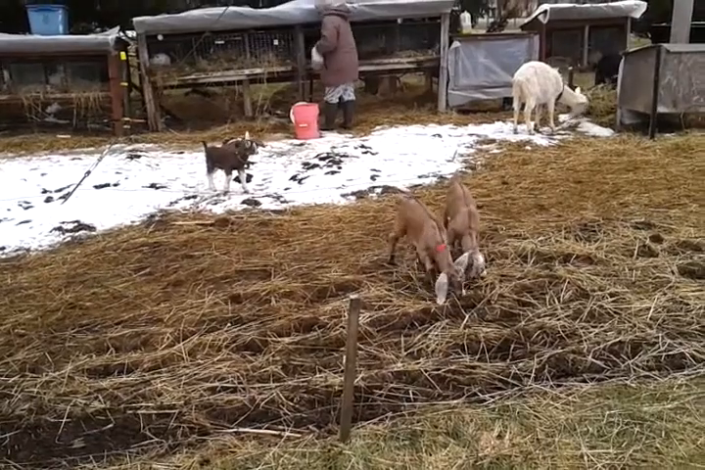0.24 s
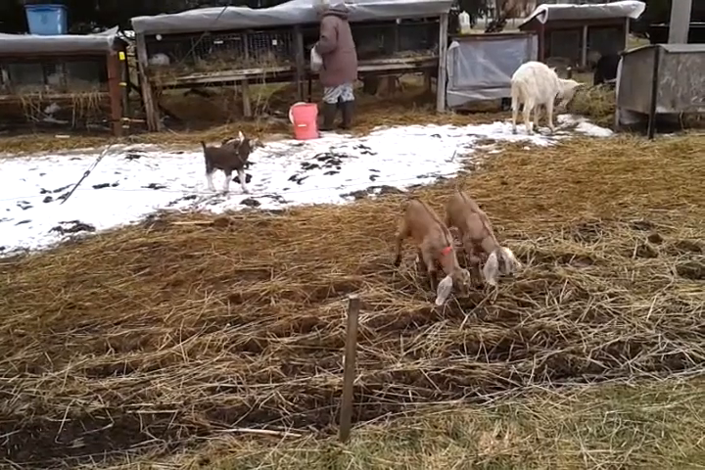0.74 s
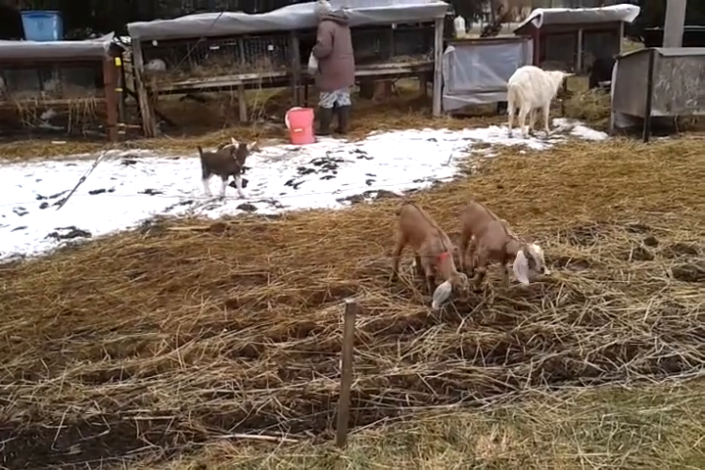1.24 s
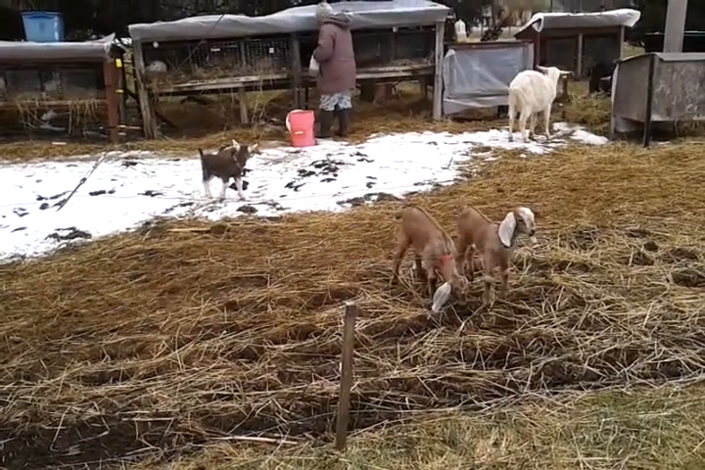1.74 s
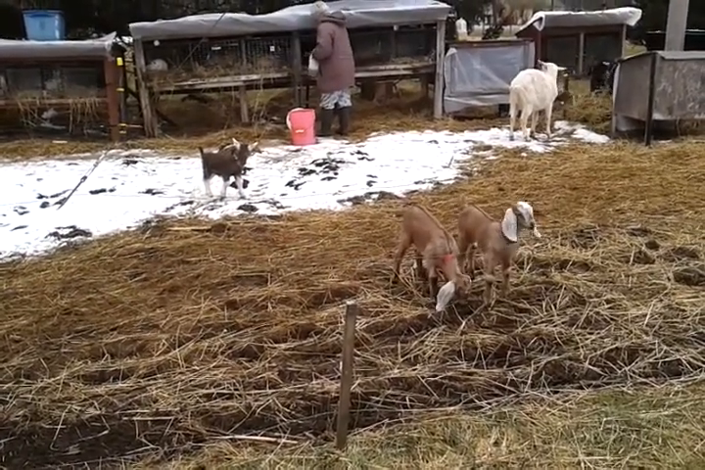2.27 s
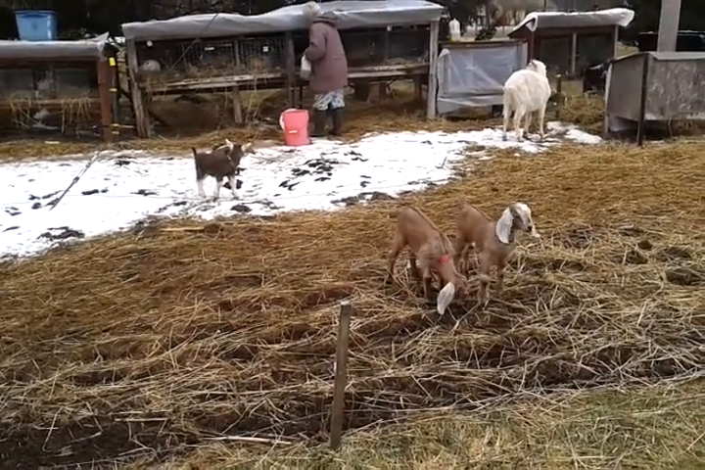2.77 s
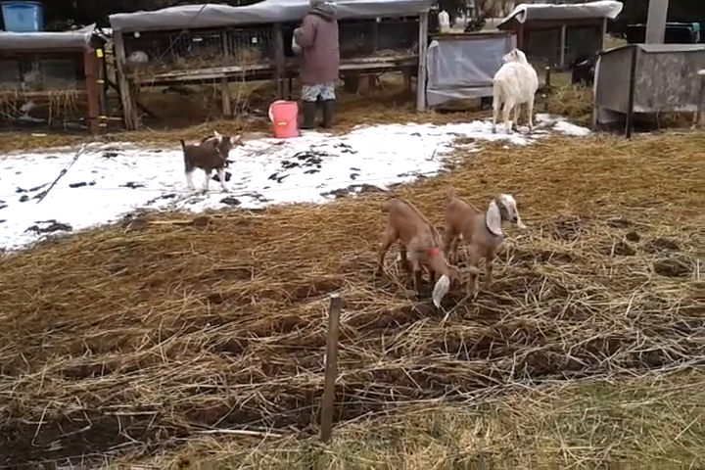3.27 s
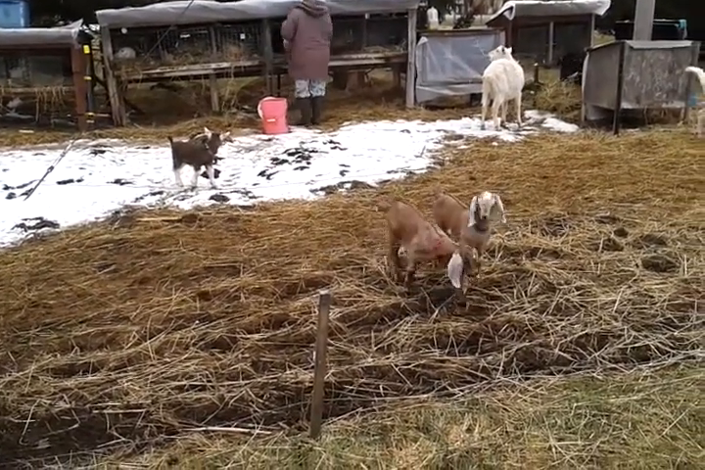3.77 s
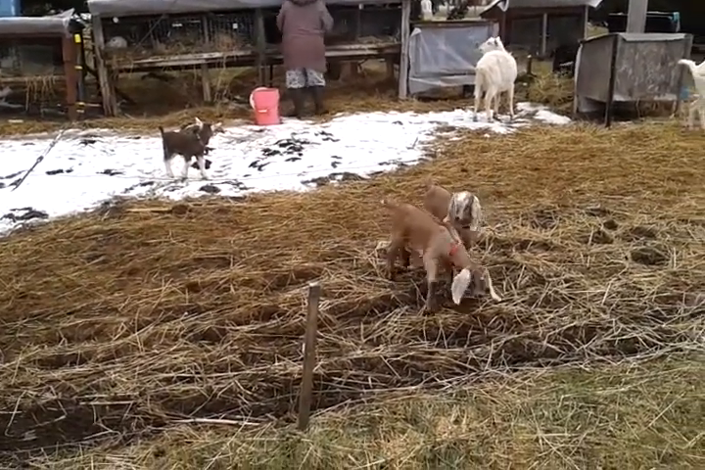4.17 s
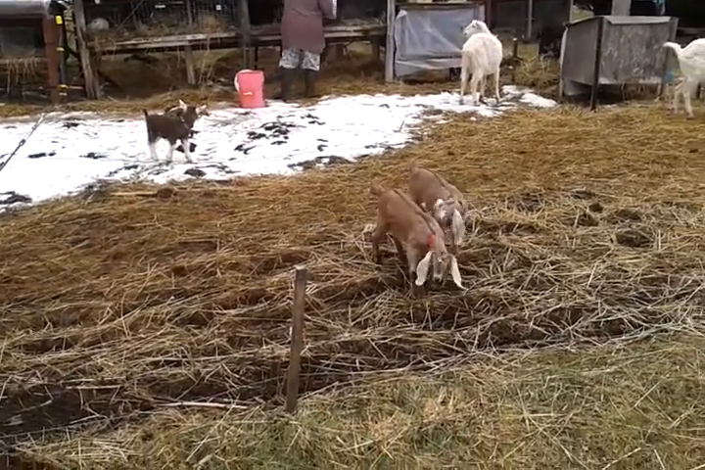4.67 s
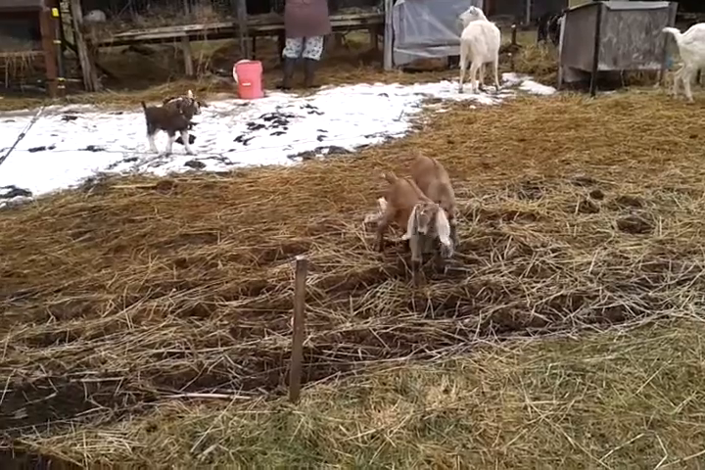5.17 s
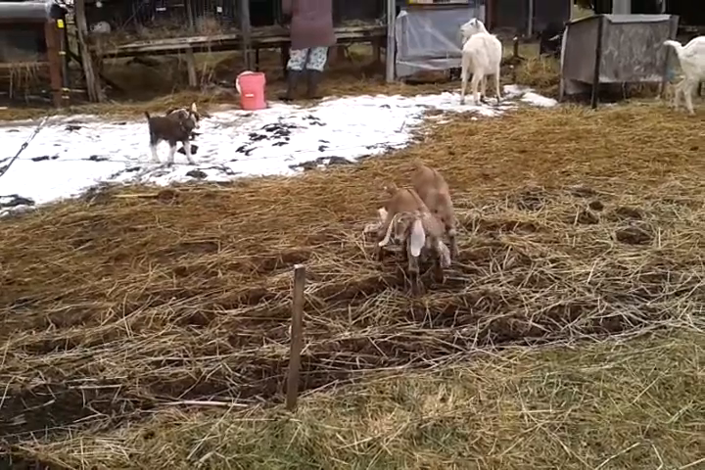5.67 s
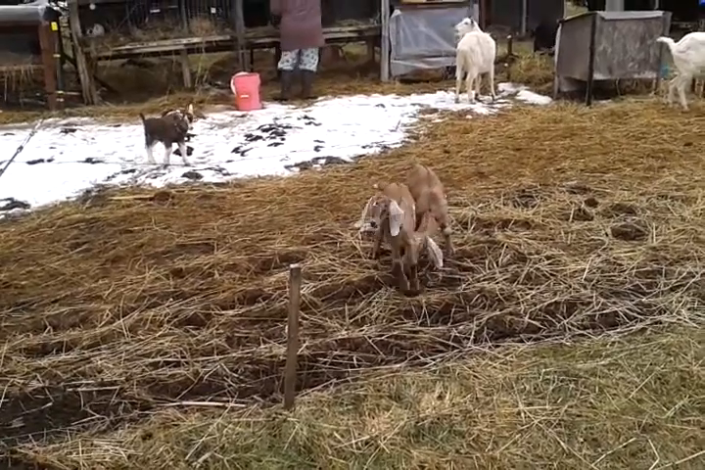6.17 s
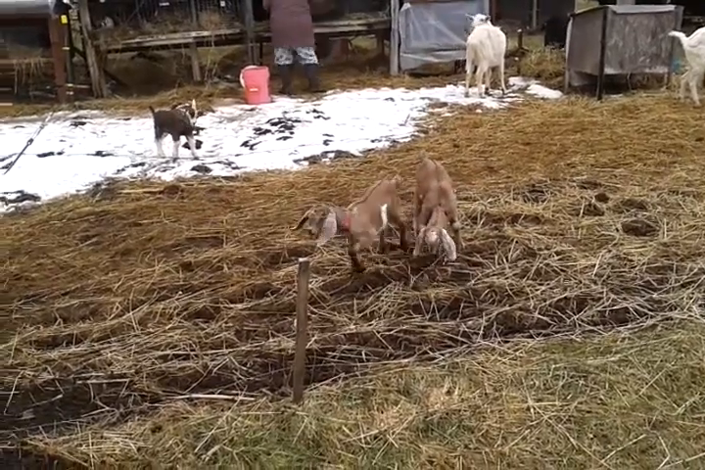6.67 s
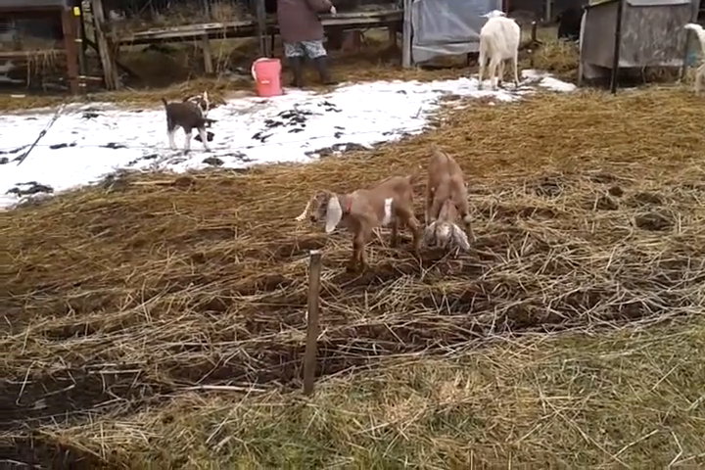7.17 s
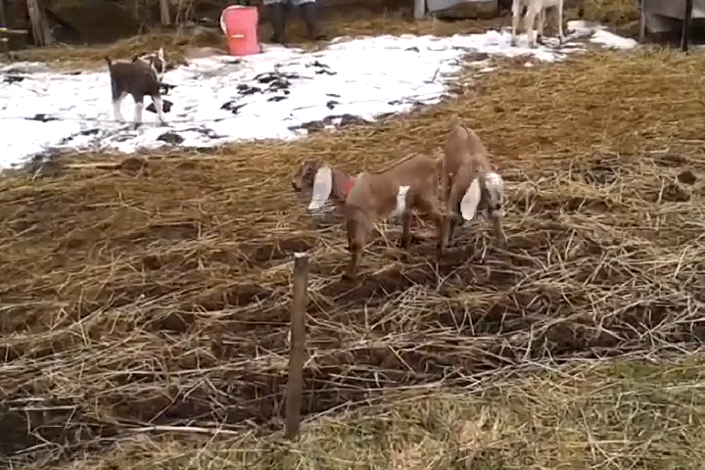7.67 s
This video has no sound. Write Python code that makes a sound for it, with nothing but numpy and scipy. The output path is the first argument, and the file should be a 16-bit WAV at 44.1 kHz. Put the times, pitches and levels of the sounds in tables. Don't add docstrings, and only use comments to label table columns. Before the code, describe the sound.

Goats bleat and grunt over rustling straw and clucking hens, a rooster crows hoarsely, and sharp handling knocks punctuate the quiet farmyard.

```python
import sys
import numpy as np
from scipy import signal
from scipy.fft import rfft, irfft, next_fast_len
from scipy.io import wavfile
from scipy.ndimage import uniform_filter1d, map_coordinates

SR = 44100
rng = np.random.default_rng(int(sys.argv[2]) if len(sys.argv) > 2 else 0)


def boost(x):
    u = np.asarray(x, float) / 20
    return 10 ** u


def dump_mix(stems):
    frames = np.atleast_2d(stems).T
    limited = np.clip(frames, -1, 1)
    pcm = np.round(limited * 32767).astype(np.int16)
    wavfile.write(sys.argv[1], SR, pcm)


N = 349698
T = np.arange(N) / SR


def unit(x):
    return x / np.sqrt(np.mean(x ** 2) + 1e-20)


def along(points, hz):
    f, v = np.transpose(points)
    return np.interp(np.log(hz + 1), np.log(f + 1), v)


def wobble(rate, size=N):
    knots = rng.standard_normal(int(size * rate / SR) + 4)
    return map_coordinates(knots, [np.arange(size) * rate / SR])


def filtered(x, response):
    m = next_fast_len(len(x) + 8192)
    return irfft(rfft(x, m) * response(np.fft.rfftfreq(m, 1 / SR)), m)[:len(x)]


def ring(out_hz, t60, t):
    return np.sin(2 * np.pi * out_hz * t) * boost(-60 * t / t60)


def rush(spectrum, patchy_db, spiky_db):
    z = signal.stft(rng.standard_normal(N) * boost(spiky_db * wobble(400)), nperseg=512)[2]
    field = uniform_filter1d(uniform_filter1d(rng.standard_normal(z.shape), 6, 0), 8, 1)
    x = signal.istft(z * boost(patchy_db * unit(field)), nperseg=512)[1][:N]
    return unit(filtered(x, lambda hz: boost(along(spectrum, hz))))


def swells(rows):
    return sum(boost(db) * np.exp(-((T - s) / half) ** 2) for s, half, db in rows)


def resonances(throat, f):
    total = 0
    for k, (centre, width, db) in enumerate(throat):
        damping = 1j * f * width
        total = total + (-1) ** k * boost(db / 2) * damping / (centre * centre - f * f + damping)
    return total ** 2


def voice(calls, throat, gain_db, rough, jitter, quaver_hz=15, quaver_db=0, beat_hz=300, beat=0.87,
          split=0, split_hz=78, top_hz=8000):
    out = np.zeros(N)
    third_db = -10
    for rows in calls:
        s, pitch, loud, *first = np.transpose(rows)
        a, b = int(s[0] * SR), int(s[-1] * SR)
        t, size = T[a:b], b - a
        share = np.clip(np.interp(t, *np.transpose(rough)) if np.ndim(rough) else rough, 0, 1)
        quaver = np.sin(2 * np.pi * quaver_hz * (t - s[0]) + .5 * wobble(13.0, size))

        unsteady = jitter * wobble(60, size) + .013 * share * wobble(beat_hz, size)
        turn = 2 * np.pi * np.cumsum(np.interp(t, s, pitch) * (1 + unsteady)) / SR
        k = np.arange(1, int(top_hz / pitch.max()) + 1)[:, None]
        weight = boost((k == 1) * np.interp(t, s, first[0]) + (k == 3) * third_db) if first else 1
        pulses = unit(np.sum(weight * np.cos(k * turn), axis=0))
        pulses = pulses * (1 + beat * share * wobble(beat_hz, size))
        second = np.cos(2 * np.pi * np.cumsum(split_hz * (1 + .35 * wobble(40, size))) / SR)
        pulses = pulses * (1 + split * share * (2 * second - 1))

        breath = unit(rng.standard_normal(size) * (1 + np.cos(turn)))
        source = np.sqrt(1 - share ** 2) * pulses + share * breath
        sound = unit(filtered(source, lambda f: resonances(throat, f)))
        fade = np.clip(np.minimum(t - s[0], s[-1] - t) / 0.007, 0, 1)
        out[a:b] += sound * fade * boost(np.interp(t, s, loud) + gain_db + quaver_db * quaver)
    return out


def shaped(calls, shape):
    attack, release, edge_db, sag_db, scoop = shape
    shapes = []
    for s, length, db, hz, glide in calls:
        end_hz, end_db = hz * (1 + glide), db - sag_db
        shapes.append([(s, hz * (1 - scoop), db - edge_db),
                       (s + attack, hz, db),
                       (s + max(length - release, attack * 1.4), end_hz, end_db),
                       (s + length, end_hz, end_db - edge_db)])
    return shapes


# pitch_hz, density_db
AIR_SPECTRUM = [(15, -53.5), (25, -14), (254, 0.5), (765, 0.5), (3710, -14.5), (5840, -11.5), (6910, -17),
                (7600, -18.5), (9200, -20.5), (16700, -120)]


def air():
    return boost(-56.5) * rush(AIR_SPECTRUM, patchy_db=1.2, spiky_db=1.0)


# middle_s, half_length_s, level_db
WIND_GUSTS = [
    (.95, .3, -80),
    (6.0, 0.42, -75.5),
    (7.0, 0.29, -71.5),
    (7.48, 0.081, -64),
    (7.8, 0.24, -74),
]
# middle_s, half_length_s, level_db
HUM_SURGES = [
    (0, 0.39, -66.5),
    (5.6, .06, -56.5),
    (6.3, .5, -88),
]


def wind():
    rumble = rush([(25, -40), (42, -3), (60, 0), (75, -20), (120, -70)], patchy_db=1, spiky_db=0)
    hum = rush([(60, -40), (95, -3), (120, 0), (160, -20), (300, -70)], patchy_db=1, spiky_db=0)
    return (boost(-83) + swells(WIND_GUSTS)) * rumble + (boost(-81) + swells(HUM_SURGES)) * hum


# middle_s, half_length_s, crackle_db, shuffle_db
STRAW_STIRS = [(0.443, 0.024, -56, -58), (0.549, 0.072, -53.5, -55.5), (0.772, 0.22, -67.5, -76),
               (1.242, 0.18, -60, -62.5), (1.51, 0.075, -57.5, -58), (1.631, 0.037, -55.5, -58.5),
               (1.968, 0.096, -65, -62), (2.741, 0.078, -62, -60.5), (3.284, 0.12, -68, -63.5),
               (3.732, 0.051, -61.5, -69), (4.402, 0.072, -60, -57.5), (4.654, 0.078, -65.5, -51.5),
               (4.83, 0.21, -63.5, -57.5), (4.964, 0.019, -67, -55.5), (5.174, 0.098, -57, -54),
               (5.359, 0.078, -64, -58), (5.559, 0.037, -54.5, -49), (5.7, 0.085, -54, -62),
               (5.975, 0.097, -55, -68), (6.126, 0.13, -78, -57), (6.96, 0.078, -88, -59)]
# pitch_hz, density_db
CRACKLE_SPECTRUM = [(1760, -48.5), (3000, -16.5), (3970, -22), (4500, -2), (5770, -1), (6790, -8.5),
                    (7600, -18), (9200, -23.5), (16700, -120)]
# pitch_hz, density_db
SHUFFLE_SPECTRUM = [(88, -51), (150, -13), (532, -3), (640, -9.5), (804, -6), (2510, -8.5), (3290, -14),
                    (4500, -15.5), (5850, -28), (9900, -120)]


def straw():
    s, half, crackle_db, shuffle_db = np.transpose(STRAW_STIRS)[..., None]
    coarse = T[::64]
    swell = np.exp(-np.abs((coarse - s) / half) ** 4)
    crackle = np.interp(T, coarse, np.sum(boost(crackle_db) * swell, axis=0))
    shuffle = np.interp(T, coarse, np.sum(boost(shuffle_db) * swell, axis=0))
    bright = crackle * rush(CRACKLE_SPECTRUM, patchy_db=4.5, spiky_db=3.5)
    return bright + boost(1.5) * shuffle * rush(SHUFFLE_SPECTRUM, patchy_db=4.0, spiky_db=1.5)


# middle_s, half_length_s, level_db
GRIP_SHIFTS = [
    (4.65, 0.063, -78),
    (5.7, 0.98, -69),
    (6.27, 0.085, -59),
    (7.03, 0.11, -58),
]


def grip():
    spectrum = [(90, -39), (180, -11.5), (290, 1.0), (420, 3.0), (900, -60.0)]
    return swells(GRIP_SHIFTS) * rush(spectrum, patchy_db=4.0, spiky_db=1.5)


def struck(blows):
    out = np.zeros(N + SR)
    for s, sound in blows:
        out[round(s * SR):][:len(sound)] += sound
    return out[:N]


# start_s, peak_db, pitch_hz, t60_s
DULL_TAPS = [(0.164, -53.5, 1020, 0.034), (0.29, -49.5, 616, 0.066), (1.69, -49.5, 668, 0.098),
             (2.078, -46, 614, 0.067), (2.583, -46, 660, .04), (3.177, -49, 807, 0.075),
             (3.18, -51, 226, 0.084), (3.258, -43.5, 1005, 0.027), (4.87, -48, 420, 0.083),
             (5.114, -47, 1400, 0.025), (5.126, -37, 1342, .03), (5.136, -37, 1500, .03),
             (4.436, -40.5, 1020, 0.014), (4.941, -40.5, 994, 0.02), (5.571, -37, 1020, 0.019),
             (5.962, -39, 427, 0.02), (7.072, -31.5, 422, 0.014), (7.082, -40.5, 297, 0.028),
             (7.115, -37.5, 343, 0.016)]


def taps():
    t, blows = np.arange(SR // 8) / SR, []
    for s, db, hz, t60 in DULL_TAPS:
        body = ring(hz, t60, t) + .5 * ring(hz * rng.uniform(1.4, 1.6), t60 * 1.7, t)
        blows.append((s, boost(db + 6) * body * (1 - np.exp(-t / 0.0012))))
    return struck(blows)


# start_s, peak_db, pitch_hz, thump_db
FINGER_TICKS = [(1.087, -39, 6040, -14), (1.4568, -41, 4620, 2), (1.6428, -36, 6300, -23),
                (2.596, -34.5, 5880, -25), (2.6327, -34, 6100, -4.5), (3.176, -38, 4830, -3),
                (3.2633, -43, 5850, 1), (3.3072, -32, 6100, -27), (3.96, -33.5, 6040, -19),
                (4.3817, -40.5, 5700, -28), (4.945, -38.5, 6320, -16), (5.532, -40.5, 5000, -17),
                (5.5527, -32.5, 5460, -8), (5.5649, -30.5, 4440, -21), (5.5776, -30.5, 5650, 0),
                (5.6093, -26.5, 4300, -5), (6.1616, -32, 4100, -12.5), (6.173, -31, 3600, -2.5),
                (6.2084, -26, 3550, -5), (6.2387, -23.5, 3820, -44), (6.2488, -23.5, 4070, -4.5),
                (6.2856, -32, 4500, 4.5), (6.356, -25.5, 4500, -22), (7.0925, -37.5, 3830, -17),
                (7.456, -46, 2900, -29)]


def ticks():
    t, blows = np.arange(SR // 8) / SR, []
    for s, db, hz, thump_db in FINGER_TICKS:
        blow = t / 0.00021 * np.exp(1 - t / 0.00025)
        tones = np.sin(2 * np.pi * hz * t) + 0.38 * np.sin(2 * np.pi * .78 * hz * t)
        crack = blow * (tones + 0.1 * rng.standard_normal(len(t)))
        dullness = (6300 - hz) / 1500
        body = 0.73 * ring(rng.uniform(1700, 2600), 0.014, t)
        body += 0.91 * ring(rng.uniform(840, 1600), 0.011, t)
        body += 0.48 * ring(rng.uniform(600, 900), 0.011, t)
        crack += body * (1 - np.exp(-t / 0.0005)) * np.clip(dullness, 0.12, 1)
        scatter = boost(-60 * t / 0.033) * rng.standard_normal(len(t))
        crack += 0.12 * np.clip(dullness, 0.2, 1) * scatter
        thump = ring(rng.uniform(240, 340), .028, t) * (1 - np.exp(-t / .002))
        blows.append((s, boost(db - 2) * (crack + boost(thump_db) * thump)))
    return struck(blows)


# start_s, peak_db, panel_hz, edge_hz, edge_db
BODY_KNOCKS = [
    (7.04432, -12, 1850, 4600, -3),
    (7.92678, -3.5, 1350, 3400, -13),
]
# pitch_hz, level_db, t60_s
SHELL_MODES = [
    [(500, -16, .019), (896, -9, .011), (2300, -12, .006), (5600, -6, .0025), (3500, -9, .003),
     (7200, -22, .003)],
    [(2350, -24, .008), (680, -9, .007), (6500, -22, .004), (4800, -24, .005)],
]


def knocks():
    contact_s = .00035
    t, blows = np.arange(SR // 8) / SR, []
    u = t / contact_s
    pulse = u * np.exp(1 - u)
    for (s, db, panel_hz, edge_hz, edge_db), modes in zip(BODY_KNOCKS, SHELL_MODES):
        panel = pulse * np.sin(2 * np.pi * panel_hz * t)
        edge = boost(edge_db) * pulse ** 3 * np.sin(2 * np.pi * edge_hz * t)
        after = sum((-1) ** k * boost(level) * ring(hz, t60, t) for k, (hz, level, t60) in enumerate(modes))
        after = after * (1 - np.exp(-u))
        blows.append((s, -boost(db) * (panel - edge + after)))
    return struck(blows)


# pitch_hz, t60_s
HUTCH_DECAY = [(1100, .26), (2200, .44), (4000, .32), (7000, .2)]


def hutches(x):
    hz, t, z = signal.stft(rng.standard_normal(SR // 2), SR, nperseg=256)
    decay = boost(-60 * t / along(HUTCH_DECAY, hz)[:, None])
    tail = signal.istft(z * decay, SR, nperseg=256)[1]
    return signal.fftconvolve(np.pad(x, (500, 0)), tail / np.linalg.norm(tail))[:N]


# start_s, length_s, level_db, pitch_hz, glide_share
CHICK_PEEP = [
    (7.797, .05, -55, 1225, -.07),
]
# attack_s, release_s, edge_drop_db, sag_db, scoop_share
PEEP_SHAPE = (.012, .01, 8, 0, 0)


def chick():
    throat = [(1200, 570, -2), (2400, 600, -9), (3600, 600, -8)]
    return voice(shaped(CHICK_PEEP, PEEP_SHAPE), throat, 0, rough=.05, jitter=.003)


# start_s, length_s, level_db, pitch_hz, glide_share
HEN_CLUCKS = [
    (.33, 0.1, -59, 401, -0.043),
    (.398, .065, -46.5, 500, -0.0014),
    (1.015, 0.051, -47.5, 252, 0.28),
    (1.06, 0.2, -53, 322.6, -0.005),
    (3.26, 0.081, -50, 386, -0.077),
    (3.48, 0.071, -55.5, 388, -0.12),
    (3.61, 0.069, -55, 284, 0.11),
    (3.83, 0.09, -53, 378, 0.13),
]
# pitch_hz, width_hz, level_db
HEN_FORMANTS = [(357, 730, 1), (734, 280, 11), (1162, 54, 5.5), (2030, 200, -26)]
# attack_s, release_s, edge_drop_db, sag_db, scoop_share
CLUCK_SHAPE = (.018, .018, 10, 4, .06)


def hens():
    return voice(shaped(HEN_CLUCKS, CLUCK_SHAPE), HEN_FORMANTS, -2.5, rough=0.39, jitter=0.006, beat_hz=78.4)


# start_s, pitch_hz, level_db
NASAL_PATH = [(2.17, 2400, -59), (2.251, 2780, -59), (2.289, 2660, -75), (2.359, 2480, -58),
              (2.44, 2430, -55.5), (2.56, 2780, -56), (2.63, 2720, -57), (2.7, 2350, -54.5),
              (2.799, 2280, -69)]


def wheeze():
    s, hz, loud = np.transpose(NASAL_PATH)
    turn = 2 * np.pi * np.cumsum(np.interp(T, s, hz)) / SR
    band = np.cos(turn) * (0.43 + wobble(260))
    return band * boost(np.interp(T, s, loud, left=-120, right=-120) - 7.5)


# start_s, length_s, level_db, pitch_hz, glide_share
DOE_CALLS = [
    (.58, .42, -64.5, 165.5, -0.15),
    (1.18, .7, -51.5, 153.5, 0.053),
    (2.19, 0.086, -52.5, 156, -0.063),
    (2.31, 0.51, -51.5, 152.1, 0.012),
]
NANNY_CALLS = [
    (1.925, .085, -54, 213, 0),
    (2.1, .7, -60, 213, -.03),
    (2.905, .06, -51, 211, .01),
]
BUCK_GRUNTS = [
    (1.712, 0.07, -43.5, 182.2, -.14),
    (1.845, 0.069, -45, 198.6, -0.27),
    (2.003, 0.07, -46, 202, -0.19),
    (2.13, 0.059, -46, 170, .1),
    (2.22, 0.087, -52, 203, -0.205),
    (7.176, 0.038, -48.5, 215.5, -0.14),
    (7.292, .033, -49.5, 223, -0.1),
]
# pitch_hz, width_hz, level_db
DOE_FORMANTS = [(500, 148, 15), (626, 480, 6.5), (1010, 670, -3.5), (1800, 490, -35)]
NANNY_FORMANTS = [(450, 500, -7.5), (649, 296, 5), (826, 207, -3.5), (1180, 220, -12.5), (2580, 520, -31)]
BUCK_FORMANTS = [(655, 366, 17), (1020, 1360, 6), (1320, 960, -10)]
# attack_s, release_s, edge_drop_db, sag_db, scoop_share
BLEAT_SHAPE = (.025, .035, 12, 1, 0)
GRUNT_SHAPE = (.012, .02, 9, 4, -.02)


def goats():
    doe = voice(shaped(DOE_CALLS, BLEAT_SHAPE), DOE_FORMANTS, 1.5, rough=[(1.6, .45), (2.2, .75)], jitter=.026,
                quaver_hz=14.5, quaver_db=2.2, beat_hz=60, beat=.55)
    nanny = voice(shaped(NANNY_CALLS, BLEAT_SHAPE), NANNY_FORMANTS, 5, rough=[(2.8, .5), (2.9, .15)], jitter=.015,
                  quaver_hz=15.5, quaver_db=4, beat_hz=60)
    buck = voice(shaped(BUCK_GRUNTS, GRUNT_SHAPE), BUCK_FORMANTS, 1.5, rough=.45, jitter=.025, beat_hz=60)
    return doe + nanny + buck


# start_s, length_s, level_db, pitch_hz, glide_share
KID_FIRST = [
    (3.988, 0.071, -53, 520, 0.0145),
    (4.1, 0.081, -50.5, 520, -0.0038),
    (4.245, 0.078, -52, 487, 0.018),
]
# start_s, pitch_hz, level_db
KID_SECOND = [
    [(6.435, 566, -67), (6.46, 541, -48.5), (6.48, 533, -44.5), (6.494, 544, -40), (6.505, 543, -64)],
    [(6.545, 530, -58), (6.562, 515.5, -45), (6.6, 509, -41), (6.62, 507, -61)],
    [(6.688, 470, -54), (6.705, 476, -46), (6.718, 495, -41), (6.73, 510, -40.5), (6.748, 507, -45.5),
     (6.762, 513, -61)],
]
# start_s, length_s, level_db, pulse_hz, glide_share
KID_PANTS = [
    (6.49, 0.086, -57.5, 90, 0.0033),
    (6.595, .06, -55, 66.3, 0.0076),
    (6.665, .04, -57, 89.5, 0.0038),
    (6.735, .07, -59, 89.4, 0),
]
# pitch_hz, width_hz, level_db
KID_FIRST_FORMANTS = [(520, 360, 3), (976, 260, 8.5), (1500, 380, 4), (2190, 890, 3), (4170, 640, 1),
                      (5360, 680, 5), (6150, 320, 10.5), (7230, 1000, -9)]
KID_SECOND_FORMANTS = [(2180, 470, -3), (4300, 560, 0.5), (5000, 790, 2.5), (6040, 1180, 4.5),
                       (7190, 1500, -8)]
PANT_FORMANTS = [(5870, 660, -3), (6580, 700, -4.5)]
# attack_s, release_s, edge_drop_db, sag_db, scoop_share
PANT_SHAPE = (.015, .02, 8, 2, 0)


def kid():
    first = voice(shaped(KID_FIRST, BLEAT_SHAPE), KID_FIRST_FORMANTS, 1.5, rough=[(4.2, .35), (4.24, .65)],
                  jitter=.003)
    second = voice(KID_SECOND, KID_SECOND_FORMANTS, 0, rough=0.17, jitter=0.0048)
    return first + second + voice(shaped(KID_PANTS, PANT_SHAPE), PANT_FORMANTS, 0, rough=0.95, jitter=0.1)


# start_s, end_s, roughness_left
CLEAR_SPELLS = [
    (5.31, 5.326, .35),
    (5.35, 5.37, .6),
    (5.59, 5.62, .62),
    (6.29, 6.36, .6),
    (6.468, 6.518, .04),
    (6.69, 6.9, .28),
]


def crow(call, throat, hoarse, split):
    break_s = .012
    pure_db, choke_db = -3.5, 33.5
    s, pitch, loud = np.transpose(call)
    t = np.arange(s[0], s[-1], break_s / 2)
    rough = hoarse
    for a, b, left in CLEAR_SPELLS:
        rough = rough + (left - hoarse) * np.clip(np.minimum(t - a, b - t) / break_s + .5, 0, 1)
    rows = np.transpose([t, np.interp(t, s, pitch), np.interp(t, s, loud), pure_db - choke_db * rough ** 3])
    return voice([rows], throat, 0, rough=np.transpose([t, rough]), jitter=.004, beat_hz=200, beat=.4,
                 split=split, top_hz=3400)


# start_s, length_s, level_db, pitch_hz, glide_share
RUN_UP_RASPS = [
    (4.95, 0.071, -49.5, 468, 0.0047),
    (5.075, 0.14, -43.5, 450, 0.0067),
    (5.19, 0.073, -39.5, 500, 0),
]
# start_s, length_s, level_db, pitch_hz, glide_share
BEAK_BREATHS = [
    (5.825, .15, -41, 880, 0.016),
    (5.62, 0.18, -50.5, 860, 0),
    (5.2, 0.24, -49.5, 1600, 0.0012),
    (5.62, .38, -46.5, 950, 0.0017),
]
# pitch_hz, width_hz, level_db
RUN_UP_FORMANTS = [
    [(940, 140, -5), (2300, 510, -5)],
    [(500, 720, -4.5), (1400, 450, 7.5), (1676, 230, 11.5), (2400, 2400, -13)],
    [(600, 410, -11), (1340, 680, 1), (2520, 1130, -4)],
]
BEAK_FORMANTS = [
    [(2510, 230, -4.5), (2930, 400, -5.5)],
    [(4300, 1300, 0), (5230, 900, -7)],
    [(4300, 2100, 0), (5130, 780, -8)],
    [(898, 150, -2), (1097, 150, 0)],
]
# attack_s, release_s, edge_drop_db, sag_db, scoop_share
RASP_SHAPE = (.04, .03, 16, 4, 0)
# start_s, pitch_hz, level_db
CROW_NOTES = [
    [(5.28, 977, -55), (5.31, 1011, -37.5), (5.37, 1020, -42), (5.39, 1020, -62.5)],
    [(5.545, 964, -60), (5.575, 1015, -37), (5.64, 960, -35.5), (5.7, 952.7, -38), (5.985, 945, -37.5),
     (6.01, 914, -63)],
    [(6.255, 960, -42), (6.28, 976, -34.5), (6.46, 978.3, -35), (6.485, 986, -43), (6.53, 985, -35),
     (6.725, 954.4, -39.5), (6.768, 780, -47), (6.785, 960, -49.5), (6.83, 930, -57)],
]
# pitch_hz, width_hz, level_db
CROW_FORMANTS = [
    [(1020, 330, -10), (1823, 250, 5.5), (2040, 280, 0), (2400, 260, 5.5), (3370, 300, -12),
     (4500, 1400, -17)],
    [(1046, 284, -3), (1496, 350, 5.5), (1794, 960, -0.5), (2307, 356, 6.5), (2532, 277, 4),
     (3214, 220, -1.5), (4070, 860, -17.5), (5920, 1900, -42.5)],
    [(960, 364, -3.5), (1605, 347, 5.5), (1823, 710, -1.5), (2456, 270, 5.5), (3130, 310, -11.5),
     (4300, 590, -16), (6200, 2200, -32.5)],
]
CROW_HOARSENESS = [
    (.76, .35),
    (.8, .4),
    (.7, .85),
]


def cockerel():
    out = np.zeros(N)
    breaths = shaped(RUN_UP_RASPS + BEAK_BREATHS, RASP_SHAPE)
    for breath, throat in zip(breaths, RUN_UP_FORMANTS + BEAK_FORMANTS):
        out += voice([breath], throat, 0, rough=0.99, jitter=0.0339)
    for note, throat, (hoarse, split) in zip(CROW_NOTES, CROW_FORMANTS, CROW_HOARSENESS):
        out += crow(note, throat, hoarse, split)
    return out


def scene():
    yard = air() + wind() + straw() + grip()
    handling = taps() + ticks() + knocks()
    animals = chick() + hens() + wheeze() + goats() + kid() + cockerel()
    answer = hutches(boost(-10.0) * animals + boost(-30.0) * handling)
    return (yard + handling + animals + answer)[None]


# pitch_hz, gain_db
MIC_RESPONSE = [(20, -18.5), (60, -1), (6600, 1), (7400, -5), (7700, -11), (7850, -23), (8200, -30.5),
                (9150, -63)]
# pitch_hz, gain_db
MIRROR_RESPONSE = [(7700, -93.5), (7900, -25), (8300, -20), (8800, -27.5), (9150, -68)]


def microphone(x):
    mirrored = 2 * x * np.cos(2 * np.pi * 16000 * T)
    folded = filtered(mirrored, lambda hz: boost(along(MIRROR_RESPONSE, hz)))
    return filtered(x, lambda hz: boost(along(MIC_RESPONSE, hz))) + folded


def top_cut(x):
    return signal.sosfilt(signal.butter(12, 8960, fs=SR, output="sos"), x)


def record(dry):
    track = microphone(dry[0])[None]
    return top_cut(track)


dry = scene()
out = record(dry)
dump_mix(out)
```